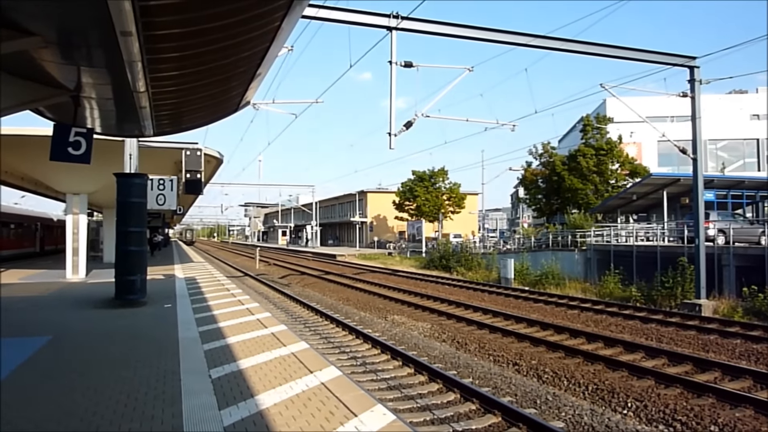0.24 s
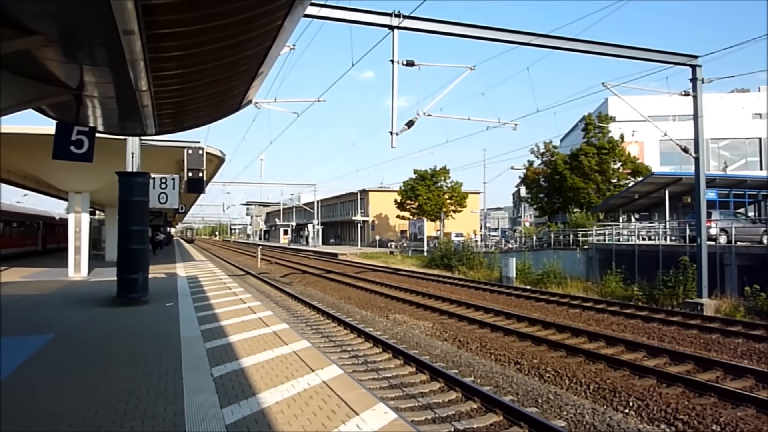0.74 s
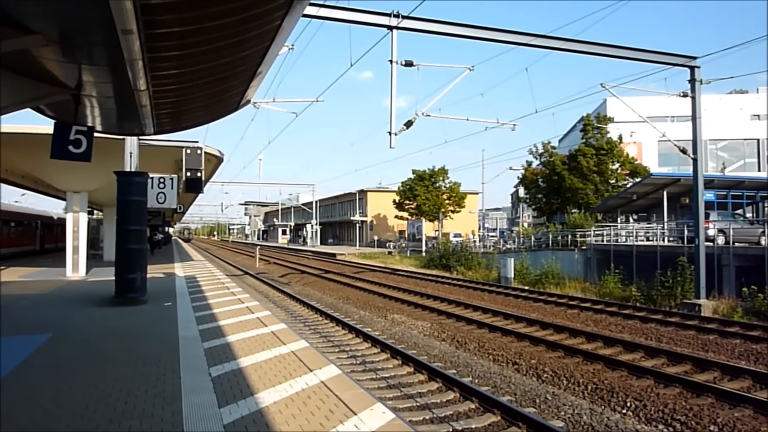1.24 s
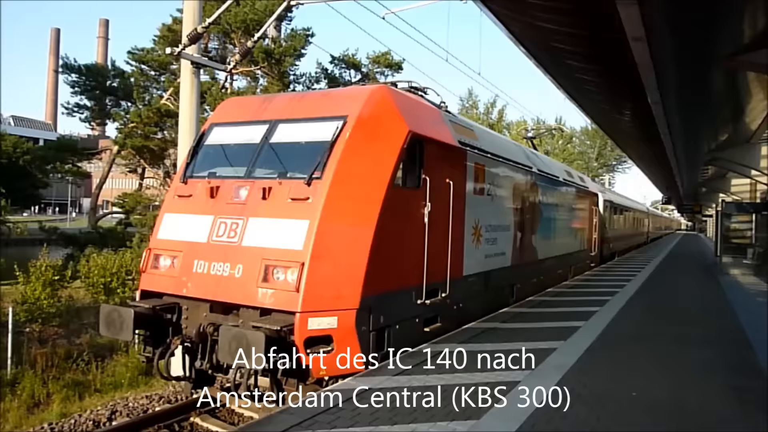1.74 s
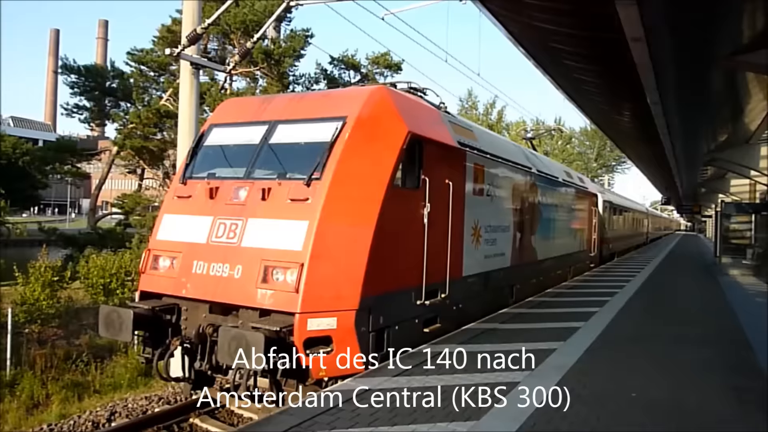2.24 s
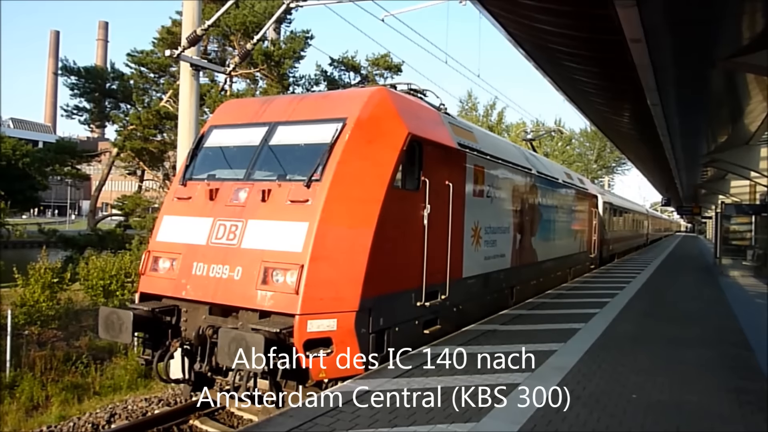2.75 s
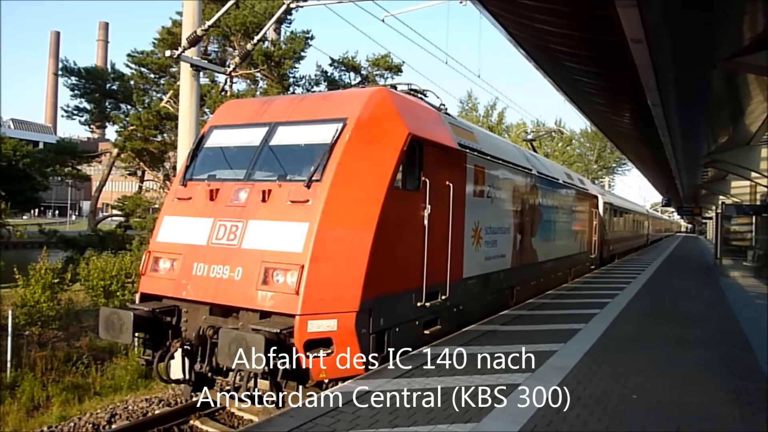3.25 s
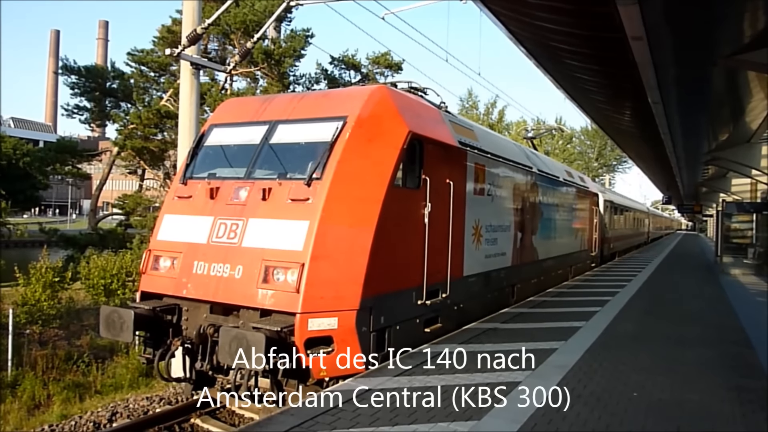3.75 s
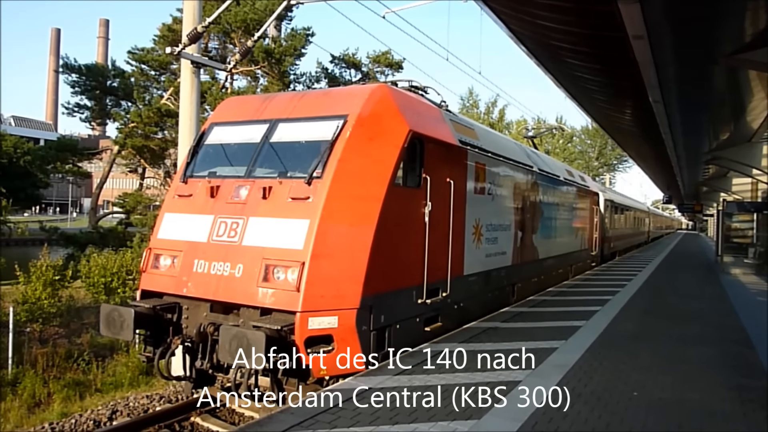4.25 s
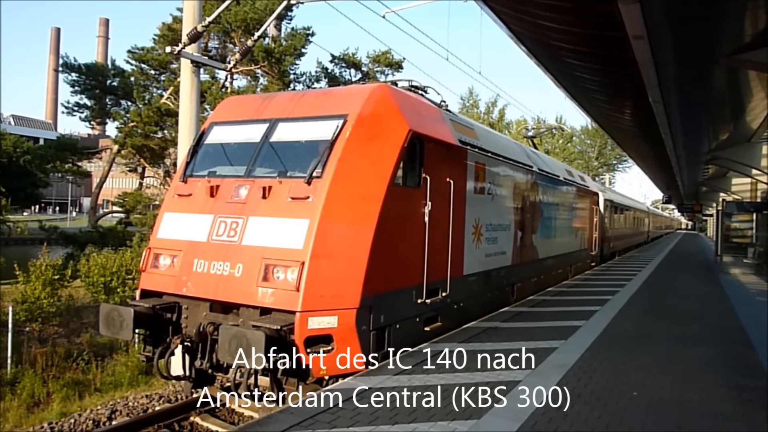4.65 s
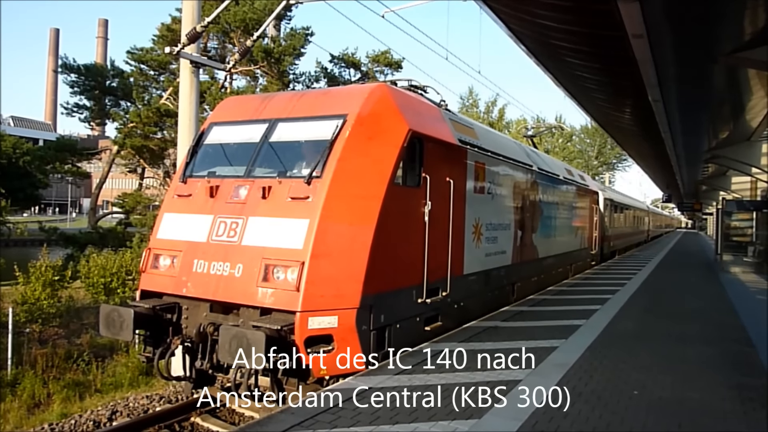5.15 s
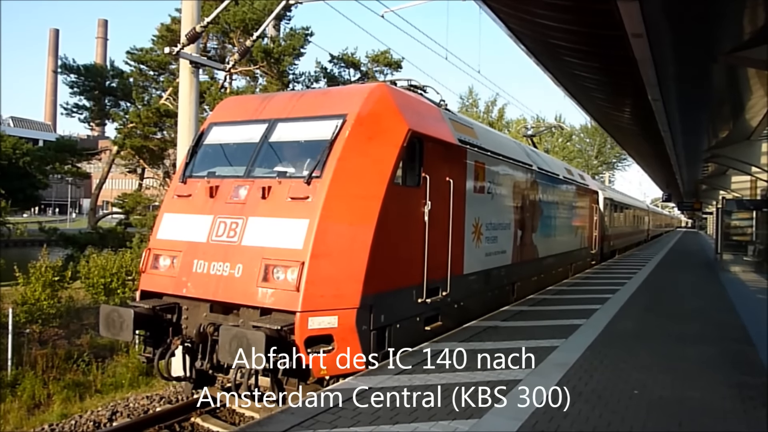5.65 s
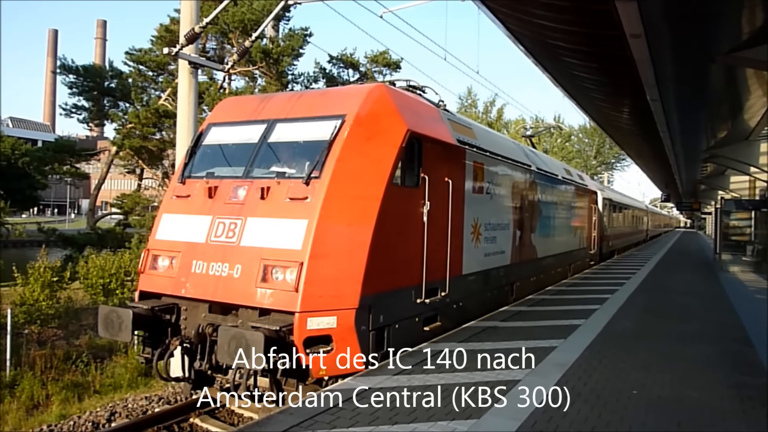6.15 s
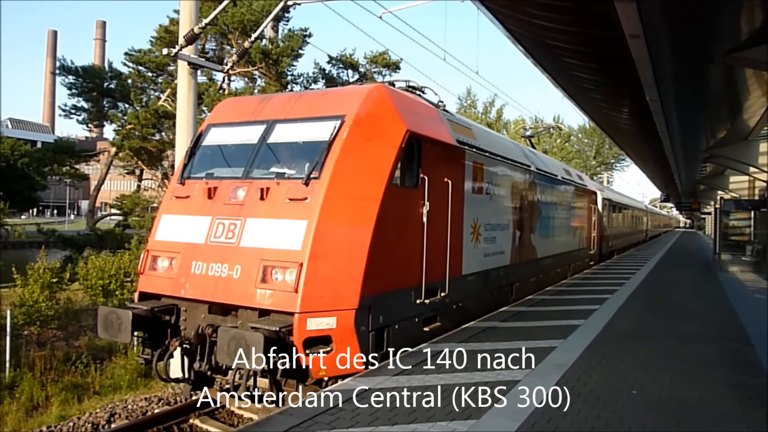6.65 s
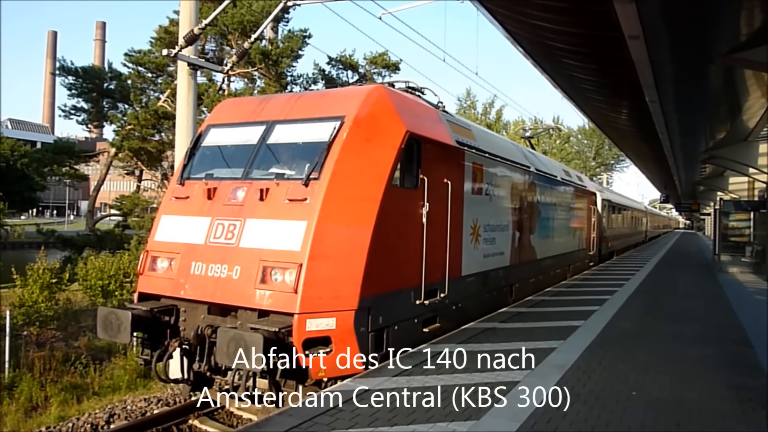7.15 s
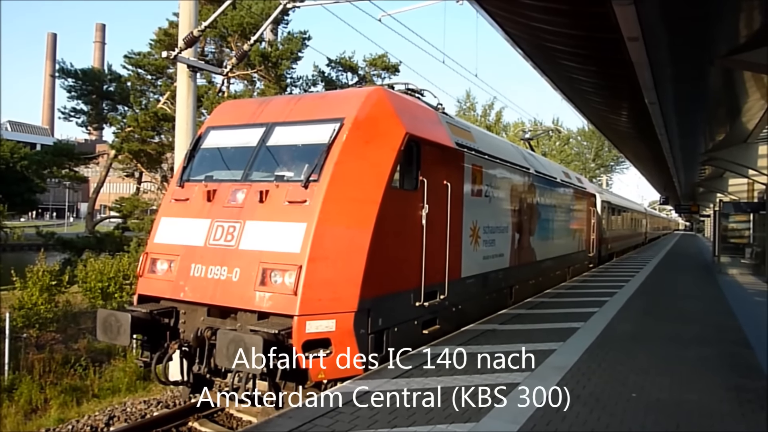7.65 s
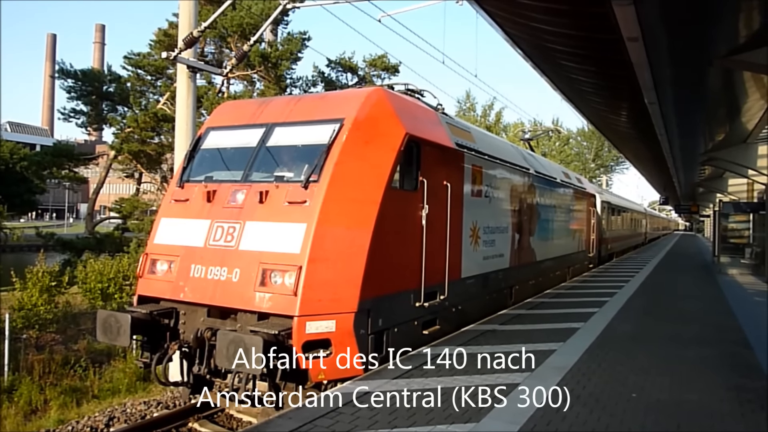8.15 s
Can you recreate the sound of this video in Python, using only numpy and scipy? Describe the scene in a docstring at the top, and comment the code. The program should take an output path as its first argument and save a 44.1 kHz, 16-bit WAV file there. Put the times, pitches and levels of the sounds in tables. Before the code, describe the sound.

Distant train roar with wind buffeting the microphone cuts to brief silence, then a nearby electric locomotive hums with steady blowers and thin converter whine.

```python
"""Far train, then a locomotive close by

Two scenes joined by a short silence. First the roar of a far train: shaped noise with wavering thin tones
and faint hiss, under gusts and thumps of wind-shaped noise. Then an electric locomotive stands close by:
blower rush is noise with resonances and gaps, with a blade tone and its octave; converter whine is a sum
of swelling tones at carrier, ripple and feed steps. A mid rush fades and the treble briefly swells.
"""
import sys
import numpy as np
from scipy import signal
from scipy.fft import irfft, next_fast_len
from scipy.io import wavfile
from scipy.ndimage import uniform_filter1d

SR = 44100
rng = np.random.default_rng(int(sys.argv[2]) if len(sys.argv) > 2 else 0)


def store_wav(level_fs):
    """Save 16-bit WAV to argv[1]."""
    pcm = np.round(np.clip(np.atleast_2d(level_fs), -1, 1) * 32767)
    wavfile.write(sys.argv[1], SR, pcm.T.astype(np.int16))


N = 370881

# Stretches with sound. Each row: start in seconds, end in seconds (hard cut), rise time in seconds.
FAR_SPANS = [(-1, 1.2191, 1), (1.2247, 1.2511, .003)]
NEAR_SPANS = [(1.9599, 9, 1e-6)]
TAIL_DB, TAIL_DB_PER_S, TAIL_S = -25, -800, .035  # a faint tail after the last stretch: start level in dB, fall in dB per second, length 35 ms

ROAR_DB, HISS_DB = -21, -53.5
# Relative roar spectrum. Each row: frequency in Hz, density in dB per Hz.
ROAR_SPECTRUM = [(24, -100), (40, -75.5), (250, -33.5), (350, -19.5), (460, -11.5), (520, -10), (750, -5.5),
                 (872, -2.5), (1150, -7.5), (1670, -10), (2200, -14.5), (2900, -29.5), (4400, -40),
                 (6000, -47), (7800, -78)]
# Rails and wheels; a negative lift is a gap. Each row: frequency in Hz, width in Hz, lift in dB.
ROAR_RINGS = [(498, 39, -9.5), (850, 110, 3), (1000, 50, 1.5), (1050, 30, 3), (1026, 86, 5), (1100, 88, -6),
              (1310, 65, 6.5), (2357, 95, -8.5), (2540, 140, 1.5), (3190, 200, 10.5), (3440, 110, 8),
              (3860, 100, 7.5), (5420, 500, 11), (7160, 200, -4.5)]
# Likeness of the two channels in the roar. Each row: frequency in Hz, likeness from 0 to 1.
ROAR_LIKENESS = [(60, 0.67), (240, 1), (950, 0.97), (3770, 0.78), (15000, 0.3)]
# Stereo lean of the roar. Each row: frequency in Hz, left over right in dB.
ROAR_LEAN_DB = [(60, 1.0), (380, 1.1), (2380, 1.5), (15000, 1.5)]
# Thin tones in the roar. Each row: mean frequency in Hz, level before swell and lean in dB rms.
STRANDS = [(809, -38), (871, -35.5), (1067, -36.5)]
STRAND_WAVER_RATIO, STRAND_SWELL_DB = .004, 3.5  # both rms
# Relative spectrum of the treble hiss. Each row: frequency in Hz, density in dB per Hz.
HISS_SPECTRUM = [(3530, -33), (6000, -1), (6280, -11), (7140, -5.5), (7800, -24.5), (8330, -10.5),
                 (8900, -26), (9950, 1), (10500, 0.5), (13500, -8.5), (14500, -13), (15100, -15.5)]

# Wind gusts. Each row: start in seconds, length in seconds, level before lumps in dB.
GUSTS = [(-.1, 0.17, -34.5), (0.355, 0.073, -45), (0.435, .07, -30), (0.495, .5, -40), (0.707, .07, -43.5),
         (0.847, 0.167, -33), (1.026, .25, -46), (1.12, 0.064, -39.5)]
# Single thumps of air. Each row: time in seconds, peak level in dB.
THUMPS = [(0.039, -27), (0.448, -22.5), (.612, -40), (.706, -28), (0.762, -29), (.872, -32), (0.982, -29.5),
          (1.104, -33), (1.14, -30)]
# Relative wind spectrum. Each row: frequency in Hz, density in dB per Hz.
WIND_SPECTRUM = [(20, -60.5), (65, -41.5), (120, -16), (220, -4), (330, 0), (480, 0), (700, -14.5),
                 (1100, -40.5), (2000, -92)]
CALM_DB, GUST_EDGE_S, THUMP_S = -53, .025, .0052
CUT_DB, START_DB, CLICK_DECAY_S = -26, -19, .00015

RUSH_DB = -21
# Relative blower spectrum. Each row: frequency in Hz, density in dB per Hz.
RUSH_SPECTRUM = [(25, -47), (60, -41.5), (95, -35), (112, -24.5), (221, -7.5), (297, -2), (782, -1.5),
                 (1050, -8), (1750, -16), (5500, -20), (5800, -25.5), (8200, -33), (12200, -40),
                 (14300, -46.5), (15100, -58), (15400, -68)]
# Resonances and gaps (negative lifts) in the rush. Each row: frequency in Hz, width in Hz, lift in dB.
RUSH_RESONANCES = [(80, 22, 7), (124, 39, 5.5), (191, 16, 4), (308.6, 56, 6.5), (835, 50, 1),
                   (4030, 200, 2), (323, 8.3, 1.5), (660, 15, 5.5), (801, 14, 3.5), (696, 37, 4.5),
                   (739, 34, -4.5), (765, 40, 7.5), (1372, 210, 4), (2157, 300, 5.5), (3040, 70, 2),
                   (3650, 150, 0.5), (4410, 120, 4.5), (4990, 150, 0), (5260, 170, 3), (5800, 200, -3),
                   (6300, 150, 2.5), (7840, 290, -16), (594, 8, -1.5), (1095, 43, -5)]
# Likeness of the two channels in the rush. Each row: frequency in Hz, likeness from 0 to 1.
RUSH_LIKENESS = [(60, 1), (150, 1), (380, 1), (950, 0.98), (2380, 0.89), (5980, 0.48), (15000, 0.28)]
# Stereo lean of the rush. Each row: frequency in Hz, left over right in dB.
RUSH_LEAN_DB = [(60, 1.0), (240, 0.56), (950, 1), (3770, 0.0), (15000, 0.23)]
BLADE_HZ, BLADE_WAVER_RATIO, BLADE_SWELL_DB = 474, .0026, 2.8  # waver and swell are rms
# Blade tone, then its octave. Each entry: level before swell and lean in dB rms.
BLADE_DB = [-35, -48]

CARRIER_HZ, RIPPLE_HZ, FEED_HZ = 276.546, 33.3815, 58.435  # switching, supply ripple, motor feed
CARRIER_MULTIPLES = range(6, 27)
# Middles of the side groups. Each entry: ripple steps off a carrier multiple.
GROUP_RIPPLE_STEPS = (-9, 0, 9)
GROUP_DB, GROUP_EDGE_DB = -76.5, -79  # before colour: up to one ripple step off the middle, two steps off
# Tones beside the carrier. Each entry: feed steps, mapped to level before colour in dB.
FEED_SIDE_DB = {-1: -78, 1: -78, 2: -82}
# What the cabinet radiates best. Each row: frequency in Hz, width in Hz, lift in dB.
CABINET = [(2060, 140, 14), (2720, 420, 19.5), (3000, 66, -3), (3380, 94, 18), (3735, 170, 17),
           (3940, 520, 13), (4484, 220, 20), (4680, 41, 6), (4884, 110, 12), (4980, 150, 19.5),
           (5500, 490, 15.5), (6074, 380, 21), (6800, 500, 13.5)]
TONE_SLOPE_DB_PER_OCTAVE, SLOPE_REF_HZ = -9.5, 3300
# Tones with a level of their own. Each row: carrier multiple, ripple steps, feed steps,
# level before swell and panning in dB rms.
OWN_LEVEL_TONES = [(0, 0, 2, -54), (0, 33, 0, -48), (0, 34, 0, -49), (7, 0, 1, -51), (8, 0, -1, -46),
                   (9, 0, 1, -52), (9, 1, 1, -54), (9, 17, 0, -51), (10, 0, -1, -50), (11, 9, 0, -50.5),
                   (11, 10, 0, -55.5), (11, -10, -1, -53.5), (10, 3, 0, -54.5), (10, 9, 0, -53.5),
                   (11, 1, 0, -52.5), (12, -1, -1, -55.5), (12, -1, 0, -49.5), (12, 1, 0, -55.5),
                   (12, -9, 0, -44.5), (12, 0, -1, -49), (12, 0, 0, -44), (12, 9, 0, -48),
                   (13, 0, 1, -49.5), (14, 1, -1, -52), (11, 0, 0, -53), (17, -9, 0, -53.5),
                   (16, 0, 0, -53), (18, -1, -1, -64), (13, -9, 0, -47), (13, 0, 0, -48.5),
                   (14, -9, 0, -49.5), (14, -9, 2, -49.5), (14, -4, 1, -53.5), (14, -3, 1, -53.5),
                   (14, -1, -1, -62), (14, 0, -1, -60), (13, 11, 1, -54.5), (15, 8, 0, -60),
                   (17, -10, 0, -52), (17, -8, 0, -55), (16, 1, 0, -46), (16, 3, 1, -55.5),
                   (17, -1, -1, -55.5), (17, -6, 2, -54.5), (16, 10, 0, -62), (17, 0, 1, -54.5),
                   (17, 1, 0, -63), (17, 0, 2, -55.5), (19, -10, 0, -54.5), (18, 2, 1, -57.5),
                   (18, 9, 0, -62), (23, -10, 0, -58), (23, -9, 1, -57.5), (17, -1, 1, -55.5),
                   (18, -1, 0, -51), (18, 0, 0, -51), (21, -9, 0, -55.5), (21, 8, 0, -51.5)]
TONE_SCATTER_DB, TONE_SWELL_DB = 2.0, 3.0  # rms, tone to tone and in time
# Tones with one long crest. Each entry: frequency in Hz.
ARCHED_HZ = [3318.6, 6074.5]
CREST_S, CREST_DB, SINK_DB_PER_S2, ARCH_FLOOR_DB = 5.3, 2.5, .95, -10

# Fading broad mid rush. Each row: time in seconds, level in dB.
FADING_RUSH = [(1.96, -29), (2.6, -33), (3.2, -38.5), (8.4, -58)]
# Brief treble swells. Each row: time in seconds, peak level in dB.
FIZZ = [(2.7, -62), (4.64, -47), (6.2, -54), (8.17, -57)]
EDGE_HZ = 15700


def gain_of(db):
    """Amplitude factor of a level in dB."""
    return 10 ** (np.asarray(db) / 20)


def evened(x):
    """Scale to rms 1."""
    return x / np.sqrt(np.mean(x ** 2) + 1e-20)


def read(points, hz):
    """Interpolate a table along log frequency."""
    f, value = np.transpose(points)
    return np.interp(np.log(hz + 1), np.log(f + 1), value)


def resonance_db(rings, hz):
    """Sum of bell-shaped lifts, each half its dB at the edges of its width."""
    return sum(lift_db / (1 + (2 * (hz - f) / width_hz) ** 2) for f, width_hz, lift_db in rings)


def wander(hz, count):
    """Slow chance curves of rms 1 that change about hz times a second."""
    steps = rng.standard_normal((count, 900))  # 100 per second
    slow = signal.lfilter([1], [1, -np.exp(-2 * np.pi * hz / 100)], uniform_filter1d(steps, size=3))
    return evened(np.array([np.interp(np.arange(N) / SR, np.arange(900) / 100, s) for s in slow]))


def noise(shape, rings=(), same=((1, 0),), lean=((1, 0),), patchy_db=0.0, size=2048):
    """Stereo noise of rms 1 from random short-time spectra, with resonances and drifting patches."""
    hz = np.fft.rfftfreq(size, 1 / SR)
    a, b, c, d, patches = rng.standard_normal((4 * N // size + 5, len(hz), 5)).T
    patches = evened(uniform_filter1d(uniform_filter1d(patches, size=16, axis=0), size=6, axis=1))
    db = read(shape, hz) + resonance_db(rings, hz)
    alike = np.clip(read(same, hz), -1, 1)[:, None]
    half_lean_db = read(lean, hz)[:, None] / 2
    left = a + 1j * b
    right = alike * left + np.sqrt(1 - alike ** 2) * (c + 1j * d)
    spectra = np.array([left * gain_of(half_lean_db), right / gain_of(half_lean_db)])
    spectra *= gain_of(db[:, None] + patchy_db * patches)
    return evened(signal.istft(spectra, nperseg=size, noverlap=size * 3 // 4)[1][:, :N])


def switched(spans):
    """Gate with linear rises and hard cuts."""
    t = np.arange(N) / SR
    return sum(np.clip((t - start) / rise, 0, 1) * (t < end) for start, end, rise in spans)


def far_train():
    """Wheels on rails roar in a few broad rings and sing in thin strands, over a faint hiss."""
    roar = gain_of(ROAR_DB) * noise(ROAR_SPECTRUM, ROAR_RINGS, ROAR_LIKENESS, ROAR_LEAN_DB, patchy_db=0.5)
    for hz, db in STRANDS:
        waver, swell = wander(4.8, count=2)
        turns = np.cumsum(hz * (1 + STRAND_WAVER_RATIO * waver)) / SR
        tone = np.sqrt(2) * np.sin(2 * np.pi * turns)
        roar = roar + tone * gain_of(db + STRAND_SWELL_DB * swell + np.array([[.7], [-.7]]))
    hiss = noise(HISS_SPECTRUM, same=[(1, .4)], lean=[(1, 1.5)], patchy_db=1.0, size=512)
    return roar + gain_of(HISS_DB) * hiss


def wind():
    """Lumpy buffeting and a few thumps, only partly alike at the two microphone ports."""
    t = np.arange(N) / SR
    gusts = 0
    for start, length, db in GUSTS:
        inside_s = np.minimum(t - start, start + length - t)
        gusts = gusts + gain_of(db) * np.clip(inside_s / GUST_EDGE_S + .5, 0, 1)
    thumps = sum(gain_of(db) * np.exp(-((t - s) / THUMP_S) ** 2) for s, db in THUMPS)
    lumpy = (gain_of(CALM_DB) + gusts) * gain_of(2.5 * wander(25, count=2))
    air = noise(WIND_SPECTRUM, same=[(1, 0.3)], lean=[(1, 1.5)], patchy_db=1.5, size=1024)
    return (lumpy + thumps) * air


def clicks():
    """Clicks at the cuts: one-sided negative spikes just before each far cut and just after the near start."""
    t = np.arange(N) / SR
    spikes = [(end, CUT_DB, -1) for _, end, _ in FAR_SPANS] + [(NEAR_SPANS[0][0], START_DB, 1)]
    return -sum(gain_of(db) * np.exp(-abs(t - s) / CLICK_DECAY_S) * (side * (t - s) > 0)
                for s, db, side in spikes)


def blowers():
    """Air rush with resonances and gaps, and the blades passing, their speed wavering a little."""
    rush = noise(RUSH_SPECTRUM, RUSH_RESONANCES, RUSH_LIKENESS, RUSH_LEAN_DB, patchy_db=0.15, size=4096)
    speed, swell = wander(5.2, count=2)
    turns = np.cumsum(BLADE_HZ * (1 + BLADE_WAVER_RATIO * speed)) / SR
    blade = sum(gain_of(db) * np.sin(2 * np.pi * (k + 1) * turns) for k, db in enumerate(BLADE_DB))
    blade_gain = np.sqrt(2) * gain_of(BLADE_SWELL_DB * swell + np.array([[.4], [-.4]]))
    return gain_of(RUSH_DB) * rush + blade * blade_gain


def converter_tones():
    """Hz and dB rms of tones at sums of carrier, ripple and feed steps."""
    sides = [(g + m, 0, GROUP_EDGE_DB if abs(m) == 2 else GROUP_DB)
             for g in GROUP_RIPPLE_STEPS for m in range(-2, 3)]
    sides += [(m, n, db) for m in (-1, 0) for n, db in FEED_SIDE_DB.items()]
    shared = {(k, m, n): db for k in CARRIER_MULTIPLES for m, n, db in sides}
    own = {(k, m, n): db for k, m, n, db in OWN_LEVEL_TONES}
    steps = np.array(list({**shared, **own}))
    hz = steps @ [CARRIER_HZ, RIPPLE_HZ, FEED_HZ]
    # the cabinet colours only tones without a level of their own
    colour_db = TONE_SLOPE_DB_PER_OCTAVE * np.log2(hz / SLOPE_REF_HZ) + resonance_db(CABINET, hz)
    colour_db += TONE_SCATTER_DB * rng.standard_normal(len(hz))
    db = [own[tuple(s)] if tuple(s) in own else shared[tuple(s)] + c for s, c in zip(steps, colour_db)]
    return hz, np.array(db)


def converters():
    """Steady tones, each swelling slowly in its own way: a narrow cluster of lines around the tone."""
    hz, db = converter_tones()
    size, count = next_fast_len(N), 128
    start, side, lag = rng.random((len(hz), 3)).T
    swell = evened(uniform_filter1d(rng.standard_normal((len(hz), count)), size=8, mode="wrap"))
    arched = (abs(hz[:, None] - ARCHED_HZ) < 1).any(axis=1)[:, None]
    step_s = np.arange(count) * size / count / SR
    arch_db = CREST_DB - SINK_DB_PER_S2 * (step_s - CREST_S) ** 2
    level_db = np.where(arched, np.maximum(arch_db, ARCH_FLOOR_DB) + swell, TONE_SWELL_DB * swell)
    cluster = np.fft.fft(gain_of(db[:, None] + level_db)) * size / count / np.sqrt(2)
    bins = np.round(hz * size / SR)[:, None] + np.fft.fftfreq(count, 1 / count)
    # each tone gets a random level and phase difference between channels
    channels = [gain_of(2.8 * (side - 1)), np.exp(1j * 1.5 * (lag - .5)) / gain_of(4.2 * side)]
    spectra = np.zeros((2, size // 2 + 1), complex)
    for k, channel in enumerate(channels):
        phased = cluster * (channel * np.exp(2j * np.pi * start))[:, None]
        np.add.at(spectra[k], bins.astype(int), phased)
    return irfft(spectra, size)[:, :N]


def fading_rush():
    """Broad mid-band noise whose level sinks along a table."""
    level_db = np.interp(np.arange(N) / SR, *np.transpose(FADING_RUSH))
    shape = [(500, -29), (900, 8), (1900, 3.5), (2400, -1.0), (3500, -43.0)]
    return gain_of(level_db) * noise(shape, same=[(1, 0.88)])


def fizz():
    """Treble noise swelling briefly under bell-shaped envelopes."""
    t = np.arange(N) / SR
    swell = sum(gain_of(db) * np.exp(-((t - s) / .025) ** 2) for s, db in FIZZ)
    shape = [(7500, -40), (9000, 2), (14500, -8), (15200, -25)]
    return swell * noise(shape, same=[(1, .5)], size=256)


def scene():
    """Far train and wind, a short silence, then the locomotive."""
    far = far_train() + wind()
    far = np.array([far[0], np.roll(far[1], 1)])  # left leads by one sample
    near = blowers() + converters() + fading_rush() + fizz()
    after_s = np.arange(N) / SR - FAR_SPANS[-1][1]
    tail = gain_of(TAIL_DB + TAIL_DB_PER_S * abs(after_s)) * (after_s >= 0) * (after_s < TAIL_S)
    return far * (switched(FAR_SPANS) + tail) + near * switched(NEAR_SPANS) + clicks()


def record(dry):
    """Band limit: a steep linear-phase low-pass."""
    lowpass = signal.firwin(511, EDGE_HZ, window=("kaiser", 9), fs=SR)
    return signal.oaconvolve(dry, lowpass[None], "same")


dry = scene()
out = record(dry)
store_wav(out)
```